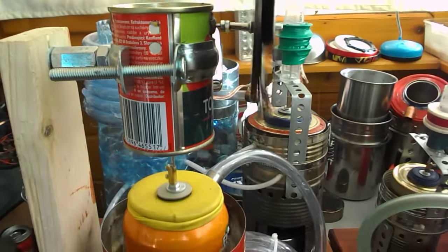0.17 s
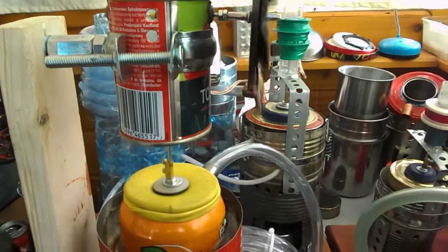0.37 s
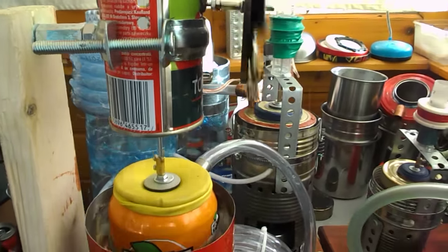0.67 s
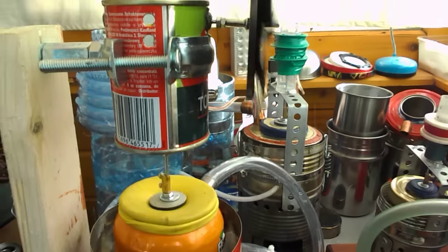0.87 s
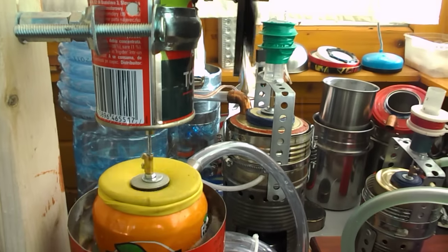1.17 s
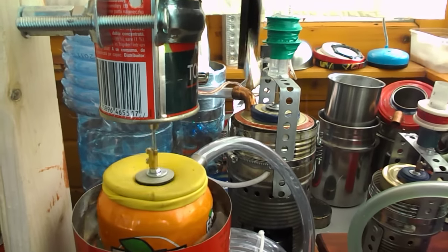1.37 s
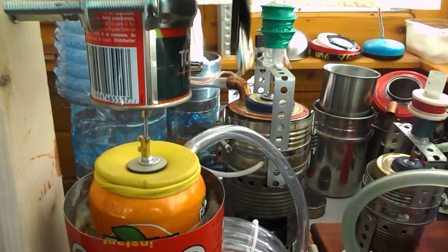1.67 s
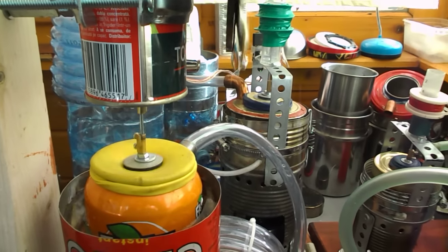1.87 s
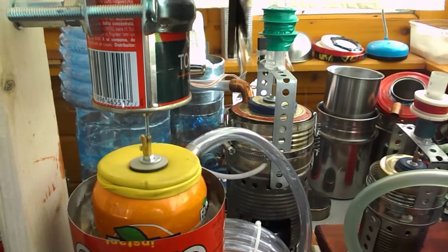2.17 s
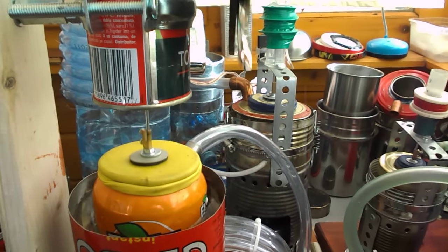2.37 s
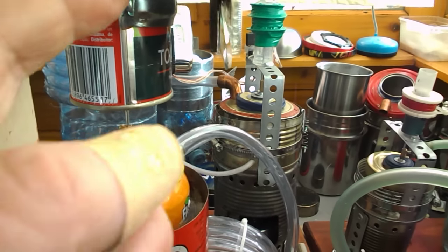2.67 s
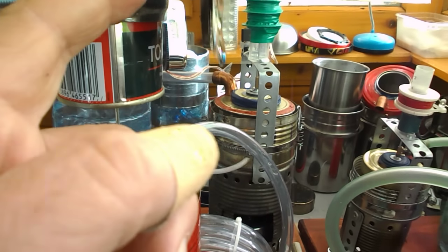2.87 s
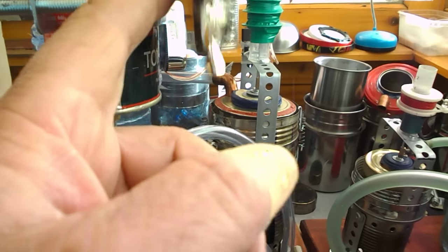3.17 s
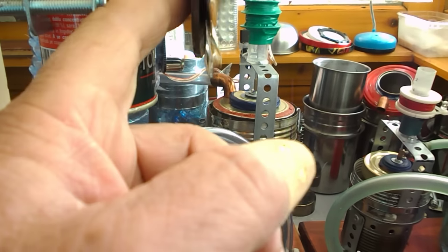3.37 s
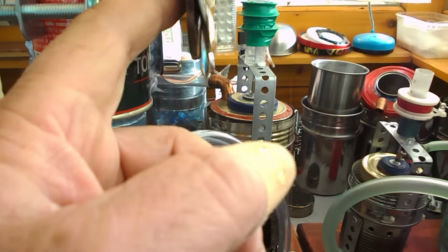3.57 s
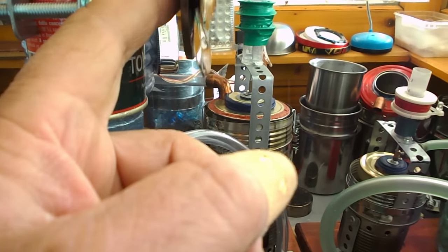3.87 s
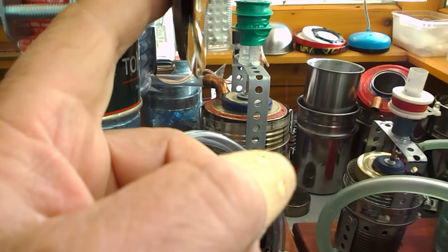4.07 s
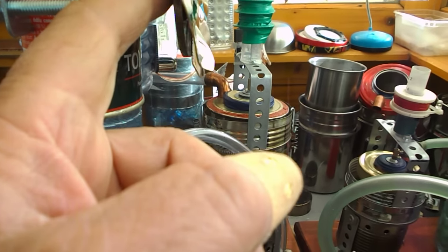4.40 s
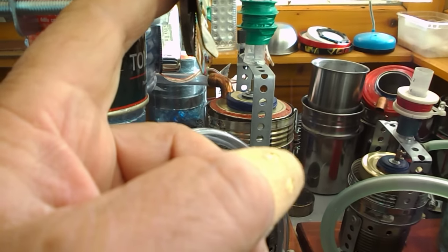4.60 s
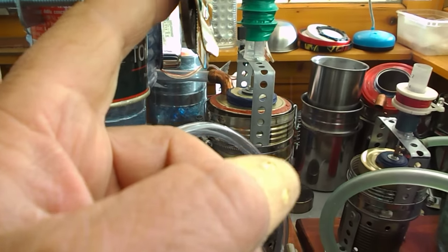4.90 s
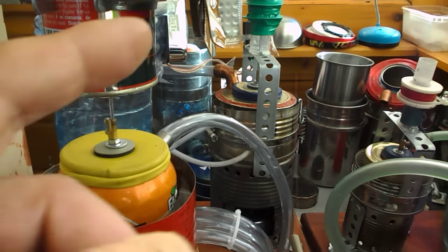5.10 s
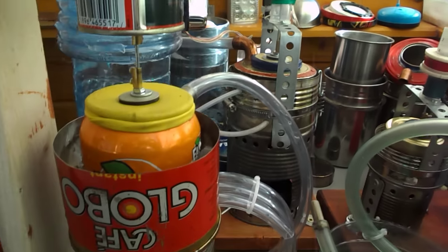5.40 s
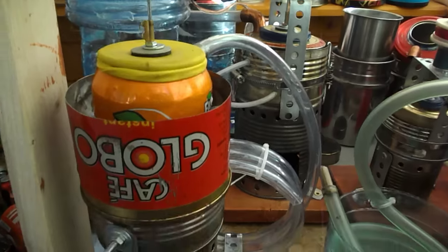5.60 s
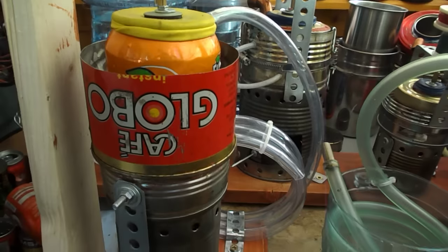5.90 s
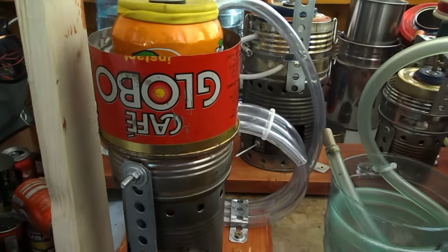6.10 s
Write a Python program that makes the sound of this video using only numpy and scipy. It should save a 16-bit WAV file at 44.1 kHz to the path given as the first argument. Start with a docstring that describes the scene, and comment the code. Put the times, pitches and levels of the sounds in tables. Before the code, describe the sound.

Fast, loose metallic ticking from a homemade can engine slackens into separate clacks, stops at about 4.6 seconds, then faint electric buzz and handling scrapes.

```python
"""A small tin-can hot-air engine clatters close to a camera in a workshop, at first about ten turns a second.
Its slack joints excite modes of cans, linkage and flywheel; hollow pops, board thuds and a few snaps join in.
The turns lengthen until a hand brakes the wheel, leaving the quiet room and a pulsing buzz present throughout.
Near the end a faint tone rises, two more snaps sound and strokes of grainy friction rub near the camera.
Blows are filtered noise bursts through decaying modes; room, air and rumble are coloured noise."""
import sys
import numpy as np
from scipy import signal
from scipy.fft import rfft, irfft
from scipy.io import wavfile
from scipy.ndimage import uniform_filter1d

SR = 44100
rng = np.random.default_rng(int(sys.argv[2]) if len(sys.argv) > 2 else 0)


def digitize_waveform(pressure):
    """Quantize a signal to 16-bit integers and store it at the path in sys.argv[1].

    Rows of a 2-D input are taken as channels; values are limited to [-1, 1].
    """
    field = np.atleast_2d(pressure).T
    bounded = np.clip(field, -1, 1)
    quanta = np.round(bounded * 32767).astype(np.int16)
    wavfile.write(sys.argv[1], SR, quanta)


N = 275625  # samples

# Levels in the tables are relative; the sources may scale them further.
# Spectral density of the room hush: f/Hz, level/dB
ROOM_SPECTRUM = [(35, -46.5), (60, -9.5), (100, -14), (170, -6), (306, -5.5), (458, -10), (1120, -12),
                 (1400, -12), (1500, -13.5), (1600, -16.5), (5470, -17.5), (7640, -15.5), (10400, -17),
                 (12500, -44), (16200, -76.5), (22000, -120)]
ROOM_DB = -55  # rms level of the hush
# Slow air on the microphone: t/s, level/dB
AIR_LEVEL = [(0, -58), (2, -63), (4.2, -60), (4.6, -75.5), (5.5, -77), (5.88, -58), (6.25, -76)]
# Faint tone of fixed pitch: t/s, level/dB
TONE_LEVEL = [(5.25, -88), (5.4, -68.5), (6.25, -68)]
TONE_HZ = 1400
# Rubbing strokes near the camera: t/s, attack/s, hold/s, release/s, low scrape level/dB, high scrape level/dB
RUB_STROKES = [(5.813, 0.036, 0.078, .01, -52, -50), (5.965, .055, 0.027, 0.11, -54.5, -48),
               (6.151, .015, .01, .025, -61, -53), (6.202, .012, .03, 0.026, -58, -51)]
# Low modes of the rubbed shell: f/Hz, level/dB, t60/s
RUB_LOW_MODES = [(400, -9, 0.012), (1000, -6, 0.0073), (1460, -14, 0.0055), (2900, -4, 0.0079),
                 (3500, -3, 0.0048)]
# High modes of the rubbed shell: f/Hz, level/dB, t60/s
RUB_HIGH_MODES = [(4530, -13, .004), (5500, -3.5, .004), (6900, 2, 0.003), (8600, -6, 0.0027),
                  (10600, -11, 0.00298)]
BUZZ_HZ, BUZZ_RATE_HZ, BUZZ_DB = 7617, 58.7, -65.5  # pitch, pulse rate, level between pulses
# Lone snaps: t/s, level/dB, f/Hz, bass level/dB, treble level/dB
SNAPS = [(.831, -1, 3560, -20, -14), (.9, -19, 3100, -25, -14), (.974, -20, 3100, -25, -10),
         (5.811, -33, 2900, -18, 0), (5.8135, -33, 2900, -18, 0)]
# Modes of the base board: f/Hz, t60/s
BOARD_MODES = [(130, 0.38), (217, 0.23)]
# Strength of the push on the board: t/s, lower mode level/dB, upper mode level/dB
BOARD_PUSH = [(0, -43, -37), (1.1, -42, -38), (1.5, -47.5, -34), (2.05, -45.5, -36.5), (2.35, -39.5, -42.5),
              (2.7, -43.5, -49), (3.2, -34, -47), (3.6, -38.5, -37), (3.85, -45, -41.5), (4.15, -43.5, -47),
              (4.4, -46, -61)]
PUSH_TURNS = (0.273, 0.1594)  # place in the turn for the lower and upper mode
SLOW_S = 3.95  # from then on the rods push the board too
# Hollow pops of the cans and membrane: t/s, level/dB, f/Hz
CAN_POPS = [(0.149, -30, 980), (.176, -28, 413), (0.245, -27, 1030), (.346, -30, 1120), (0.369, -30, 475),
            (.438, -28, 1050), (.465, -26.5, 399), (0.632, -23, 1085), (0.733, -20.5, 962),
            (.829, -18.5, 1003), (.927, -29, 1100), (1.03, -26, 800), (1.119, -21.5, 946),
            (1.219, -22.5, 1000), (1.329, -19.5, 1050), (1.403, -35, 680), (1.514, -26, 1006),
            (1.627, -18, 1080), (1.715, -28.5, 497), (1.795, -30, 1170), (1.816, -32, 503),
            (1.917, -32, 626), (1.947, -31, 450), (2.021, -33, 468), (2.117, -25.5, 620),
            (2.173, -28.5, 430), (2.272, -31, 430), (2.301, -26.5, 1130), (2.482, -31, 395),
            (2.652, -30, 466), (2.759, -31.5, 500), (2.831, -28, 440), (3.048, -25.5, 476),
            (3.15, -29, 456), (3.267, -27, 458), (3.377, -36, 404), (3.423, -32, 630), (3.461, -30.5, 395),
            (3.745, -31, 447), (3.783, -27, 523), (3.862, -30, 434), (3.911, -27, 498), (3.994, -31, 1430),
            (4.075, -34.5, 618), (4.184, -27.5, 1500), (4.315, -37.5, 555)]
# Crank pin taking up its slack: t/s, spokes level/dB, cans level/dB, rebound level in the spokes/dB
CRANK_BLOWS = [(0.0473, -8, -7, -11.5), (.144, -5.5, -10, -11), (.239, -6, -11, -13),
               (0.3351, -8, -9, -11.5), (0.4313, -7.5, -10, -10.5), (0.5282, -1, -11, -14.5),
               (.625, -4.5, -11.5, -8), (.7215, -9, -8.5, -7), (0.8202, -6.5, -9, -7),
               (0.9164, -10.5, -8, -6), (1.015, -5, -6.5, -8), (1.1142, -6, -7.5, -11),
               (1.2125, -7.5, -10, -6.5), (1.312, -8, -6, -8), (1.4098, -10, -6.5, -4),
               (1.512, -6.5, -6.5, -8), (1.611, -5, -6.5, -3.5), (1.711, -9, -10.5, -8),
               (1.813, -4.5, -6.5, -7), (1.913, -10.5, -6, -3), (2.015, -7.5, -7.5, -5.5),
               (2.1175, -9.5, -9, -12), (2.2192, -14, -18, -11), (2.321, -8, -14, -12.5),
               (2.428, -7.5, -17, -18), (2.533, -10, -11, -14), (2.637, -12.5, -13, -12),
               (2.747, -17, -15, -15.5), (2.854, -11, -16, -21), (2.963, -12.5, -19, -15),
               (3.0724, -12, -22, -16), (3.182, -15, -21, -13.5), (3.295, -13.5, -17, -18),
               (3.408, -11.5, -16, -13.5), (3.5221, -17.5, -16.5, -18.5), (3.6438, -11.5, -12.5, -22),
               (3.7685, -11, -11.5, -17.5), (3.908, -13.5, -11.5, -17), (4.07, -15, -16, -19.5),
               (4.303, -21.5, -18, -23)]
# Rods knocking on the cans between crank blows: t/s, cans level/dB
ROD_KNOCKS = [(0.0775, -12), (0.1717, -8), (.265, -13), (0.364, -7.5), (.461, -15), (.557, -15),
              (.609, -25), (0.6515, -11.5), (0.751, -18), (.849, -17), (0.899, -19), (1.0487, -17),
              (1.143, -8.5), (1.257, -15), (1.344, -14.5), (1.452, -10.5), (1.545, -10), (1.558, -18),
              (1.594, -18), (1.652, -12.5), (1.703, -20), (1.754, -13.5), (1.853, -12.5), (1.955, -13.5),
              (2.0594, -12), (2.104, -12.5), (2.1602, -12), (2.213, -11), (2.2726, -19.5), (2.305, -11.5),
              (2.364, -16), (2.404, -16), (2.411, -20), (2.4712, -9), (2.507, -16.5), (2.577, -11.5),
              (2.622, -15), (2.684, -8), (2.7306, -22), (2.794, -13), (2.835, -20), (2.897, -13.5),
              (2.928, -22), (2.947, -23), (3.005, -11.5), (3.038, -16.5), (3.053, -23), (3.116, -15.5),
              (3.148, -21), (3.167, -26), (3.255, -15.5), (3.279, -29), (3.338, -12.5), (3.364, -21),
              (3.4526, -11.5), (3.476, -19), (3.501, -19.5), (3.569, -22), (3.592, -10), (3.69, -17.5),
              (3.717, -8), (3.8466, -11), (3.9967, -11.5), (4.1848, -12), (4.578, -23.5)]
REBOUND_S, SECOND_REBOUND_S = 0.013, 0.025  # delays after a crank blow
SECOND_DB, SECOND_FADE_DB_PER_MS = -6.5, -0.74  # the second rebound dies out as the turns get longer
FAST_TURN_S = 0.099
# Sharing of a blow as the slack shifts:
# t/s, spokes level in a rod knock/dB, cans level in a rebound/dB, light tap level/dB
BLOW_SHARE = [(0, -3.5, -35, -28.5), (1.1, -10, -15, -26), (1.5, -12, -18.5, -32), (2.4, -7.5, -0.5, -20),
              (3.4, -15, -0.5, -27), (4.1, -9.5, -3, -35), (4.6, -9, 0, -53)]
TAP_TURNS = (0.682, 0.86)  # mean places of the light taps in a turn
TAP_SCATTER_S, TAP_SCATTER_DB, TAP_SPOKES_DB = 0.0028, 1, -16
# Play in the rods: t/s, first touch level/dB, rebound delay/s, rebound level/dB, linkage level below the cans/dB
ROD_SLACK = [(0, -24, 0.0085, -19, -13.5), (1.3, -18, 0.0092, -12, -13.5), (2.4, -39, 0.0052, -7, -13),
             (3.4, -18, .007, -9, -12.5), (3.7, -18, .012, -25, -11), (3.85, -10, 0.019, -5, -14),
             (4.0, -16, 0.011, -7, -14), (4.2, -10, 0.017, -8, -11.5), (4.58, -13, 0.017, -14, -13.5)]
TOUCH_S = 0.0058  # lead of the first touch over the rod knock
# Loose rattle between the knocks: t/s, spokes level/dB, cans and linkage level/dB, rumble level/dB
RATTLE_LEVELS = [(0, -29.5, -22, -43), (.4, -33, -26, -42.5), (.75, -32, -24.5, -42),
                 (1.4, -30.5, -22, -42), (2.4, -40, -29, -42.5), (2.7, -40, -31, -45),
                 (3.55, -35.5, -27.5, -44.5), (4.19, -37, -38, -47), (4.32, -42, -35.5, -53.5),
                 (4.45, -50.5, -50.5, -52), (4.602, -49, -44, -48)]
# Metal modes, of the linkage below 4400 Hz, the cans to 7700 Hz, the spokes above: f/Hz, level/dB, t60/s
TIN_MODES = [(1468, -14.5, 0.024), (2262, -8.5, 0.039), (2750, -20, 0.0093), (2980, -5, 0.03),
             (3403, -3.5, 0.021), (3647, -6.5, 0.04), (4010, -2, 0.028), (4342, 1, 0.017),
             (4885, -17, 0.074), (4940, -6.5, 0.014), (5167, -13.5, 0.05), (5364, -1.5, 0.0075),
             (5290, -16, 0.011), (5960, -0.5, 0.0097), (6660, -3.5, 0.0047), (6670, 5.5, 0.0097),
             (6860, 2, 0.0098), (6880, -10, 0.0085), (7460, 1.5, 0.0097), (8183, 1, 0.0093),
             (8100, -2.5, 0.0038), (8610, -6, 0.058), (8930, -1.5, 0.017), (9090, 5.5, 0.018),
             (9464, -0.5, 0.024), (9980, 4, 0.013), (10384, -10, 0.022)]
# Flywheel modes: f/Hz, level/dB, t60/s
WHEEL_MODES = [(2568, -13, .3), (3537, -2, .22), (5862, 4, .55), (5925, 4, .7), (7957, -13, .4),
               (8592, -12, .35), (8699, -13, .3), (9162, -12, .37), (9340, -10, .45), (9475, -10, .25),
               (10250, -10, .5), (11800, -21, .5)]
# How freely the rim rings: more as the turns slow, until the hand stops it: t/s, level/dB
RIM_FREEDOM = [(0, -24), (3.5, -20), (3.9, -8), (4.575, -7), (4.61, -50)]
# Spectral density of the frame rumble: f/Hz, level/dB
RUMBLE_SPECTRUM = [(35, -53), (60, -22), (129, -6), (183, -16.5), (377, 1), (445, 2.5), (732, -10.5),
                   (1020, -4.5), (1920, -19.5), (2200, -16), (2860, -28), (4840, -120)]
TOP_HZ = 12050  # upper limit of the camera's band


def undb(db):
    """Level law: amplitude is ten to the power dB / 20."""
    return 10 ** (np.asarray(db) / 20)


def unit(x):
    """Normalization to a root-mean-square value of 1."""
    return x / np.sqrt(np.mean(x ** 2))


def curve(s, v):
    """Linear interpolation in time through the given points, held beyond the ends."""
    return np.interp(np.arange(N) / SR, s, v)


def ring(x, hz, t60):
    """Damped resonance of one mode: a unit click rings with an exponential envelope starting at 1."""
    pole = np.exp(2j * np.pi * hz / SR - np.log(1000) / (t60 * SR))
    return signal.lfilter([1], [1, -pole], x).imag


def coloured(points):
    """Spectral shaping of white noise, normalized to rms 1."""
    hz, db = np.transpose(points)
    f = np.maximum(np.arange(N // 2 + 1) * SR / N, 1)
    shape = undb(np.interp(np.log(f), np.log(hz), db))
    return unit(irfft(rfft(rng.standard_normal(N)) * shape, N))


def strikes(s, size, fall_s):
    """Impulsive excitation: sudden start, exponential fall, energy equal to size squared."""
    x, keep = np.zeros(N), np.exp(-1 / (fall_s * SR))
    at = np.clip((np.asarray(s) * SR).astype(int), 0, N - 1)
    np.add.at(x, at, size)
    return signal.lfilter([np.sqrt(1 - keep ** 2)], [1, -keep], x)


def chatter(rate, spread_db):
    """Random superposition of small contacts, rate per second, of scattered size; rms 1."""
    place, size = rng.random((int(rate * N / SR), 2)).T
    return unit(strikes(place * N / SR, undb(spread_db * (size - 1)), 0.00069))


def wander(spread_db, rate):
    """Random modulation: the gain of a mode wanders irregularly, rate steps per second."""
    steps = rng.standard_normal(int(rate * N / SR) + 2)
    return undb(spread_db * curve(np.arange(len(steps)) / rate, steps))


def room_hush():
    """Stationary diffuse noise: the room has a fixed spectrum and level."""
    return undb(ROOM_DB) * coloured(ROOM_SPECTRUM)


def air():
    """Low-frequency pressure fluctuation: slow air on the microphone as modulated band noise."""
    gust = coloured([(15, -32), (28, -5), (50, -2.5), (90, -33.5)])
    return undb(curve(*np.transpose(AIR_LEVEL))) * gust


def faint_tone():
    """Pure tone: a sinusoid of fixed frequency and changing amplitude."""
    t = np.arange(N) / SR
    return undb(curve(*np.transpose(TONE_LEVEL))) * np.sin(2 * np.pi * TONE_HZ * t)


def buzz():
    """Amplitude modulation: a thin electric tone jumps and decays once each pulse period."""
    t = np.arange(N) / SR
    pulse = 1 + 4.4 * np.exp(-(t * BUZZ_RATE_HZ % 1) / 0.055)
    return undb(BUZZ_DB) * np.sin(2 * np.pi * BUZZ_HZ * t) * pulse


def rubbing():
    """Friction excitation: grainy noise through broad modes of a plastic shell, one swell per stroke."""
    grain = 1 + 0.33 * chatter(rate=600, spread_db=11)
    out = 0
    for k, modes in enumerate((RUB_LOW_MODES, RUB_HIGH_MODES)):
        shell = sum(undb(d) * ring(rng.standard_normal(N), f, t60) for f, d, t60 in modes)
        press = 0
        for s, rise, hold, fall, *db in RUB_STROKES:
            press = press + undb(db[k]) * curve(np.cumsum([s, rise, hold, fall]), [0, 1, 1, 0])
        out = out + press * unit(shell * grain)
    return out


def workshop():
    """Linear superposition of the room hush, slow air, rubbing and faint tone."""
    return room_hush() + air() + rubbing() + faint_tone()


def snaps():
    """Impulse response: a dry click excites a middle, a treble and a bass resonance."""
    out = 0
    for s, db, hz, bass_db, treble_db in SNAPS:
        click = strikes([s], undb(db), 1e-5)
        treble = undb(treble_db) * ring(click, 6750, 0.0084)
        thump = undb(bass_db + 13) * ring(click, 380, 0.0025)
        out = out + ring(click, hz, 0.0043) + treble + thump
    return out


def board():
    """Modal excitation: a push once a turn, later also by the rods, swells two low modes of the base."""
    s, rod_s = np.array(CRANK_BLOWS)[:, 0], np.array(ROD_KNOCKS)[:, 0]
    s = np.sort(np.r_[s, rod_s[rod_s > SLOW_S]])
    turn = np.minimum(np.diff(s, append=s[-1]), 0.16)
    t, *levels = np.transpose(BOARD_PUSH)
    out = 0
    for db, place, (hz, t60) in zip(levels, PUSH_TURNS, BOARD_MODES):
        at = s + place * turn
        push = strikes(at, undb(np.interp(at, t, db, right=-90)), 1e-5)
        rung = ring(push, hz, t60)
        # the band filter softens the onset into a swell
        band = signal.butter(1, [hz * 0.62, hz * 1.04], "band", fs=SR, output="sos")
        out = out + signal.sosfilt(band, rung)
    return out


def pops():
    """Strongly damped cavity oscillation: short hollow rings, each a few cycles long."""
    out = np.zeros(N + SR)
    t = np.arange(SR // 10) / SR
    for (s, db, hz), phase in zip(CAN_POPS, rng.random(len(CAN_POPS))):
        cycle = hz * t
        envelope = (1 - np.exp(-cycle / 0.88)) * np.exp(-cycle / 5.1)
        out[int(s * SR):][:len(t)] += undb(db) * envelope * np.sin(2 * np.pi * (cycle + phase))
    return out[:N]


def knocks():
    """Impact and rebound in slack joints: times, then levels in spokes, cans and linkage."""
    s, spoke_db, can_db, back_db = np.transpose(CRANK_BLOWS)
    turn = np.diff(s, append=2 * s[-1] - s[-2])
    rod_s, rod_db = np.transpose(ROD_KNOCKS)
    share_t, rod_share, back_share, tap_share = np.transpose(BLOW_SHARE)
    back_can_db = np.interp(s, share_t, back_share)
    second_db = back_db + SECOND_DB + SECOND_FADE_DB_PER_MS * (turn - FAST_TURN_S) * 1000
    rod_spoke_db = rod_db + np.interp(rod_s, share_t, rod_share)
    t, touch_db, lag, fall_db, link_db = np.transpose(ROD_SLACK)
    touch_db, lag, fall_db = (np.interp(rod_s, t, v) for v in (touch_db, lag, fall_db))
    # rows of time, spokes level, cans level
    rows = [(s, spoke_db, can_db),
            (s + REBOUND_S, back_db, back_db + back_can_db),
            (s + SECOND_REBOUND_S, second_db, second_db + back_can_db / 2),
            (rod_s, rod_spoke_db, rod_db),
            (rod_s - TOUCH_S, rod_spoke_db + touch_db / 2, rod_db + touch_db),
            (rod_s + lag, rod_spoke_db + fall_db, rod_db + fall_db)]
    for place in TAP_TURNS:
        chance = rng.standard_normal((len(s) - 1, 2)).T
        at = (s + place * turn)[:-1] + TAP_SCATTER_S * chance[0]
        db = np.interp(at, share_t, tap_share) + TAP_SCATTER_DB * chance[1]
        rows.append((at, db + TAP_SPOKES_DB, db))
    s, spoke_db, can_db = np.concatenate(rows, axis=1)
    linkage_db = np.maximum(can_db, spoke_db - 3) + np.interp(s, t, link_db)
    return s, spoke_db, can_db, linkage_db


def joint_forces():
    """Contact excitation of spokes, cans and linkage: each knock swells and shakes on; rattle fills in."""
    s, *levels = knocks()
    t, spoke_db, can_db, _ = np.transpose(RATTLE_LEVELS)
    fills = (spoke_db - 25.5, can_db - 31.5, can_db - 37.5)
    running = np.arange(N) < t[-1] * SR
    swell = int(0.0026 * SR)
    forces = []
    for db, gain_db, fill_db in zip(levels, (-11, -10, -10), fills):
        loose = chatter(rate=2200, spread_db=13)
        size = undb(db + gain_db)
        blow = strikes(s, size, 0.004)
        blow = uniform_filter1d(uniform_filter1d(blow, swell), swell)
        shake = uniform_filter1d(strikes(s, size, 0.0061), 2 * swell) * loose
        rattle = running * loose * undb(curve(t, fill_db))
        forces.append(blow + shake + rattle)
    return forces


def tin(forces):
    """Modal superposition: noise shaped by the contact force drives linkage, cans and spokes."""
    spokes, cans, linkage = forces
    out = 0
    for f, d, t60 in TIN_MODES:
        force = linkage if f < 4400 else cans if f < 7700 else spokes
        scrape = force * wander(spread_db=2.5, rate=60) * rng.standard_normal(N)
        out = out + undb(d) * ring(scrape, f, t60)
    return out


def flywheel(spokes):
    """Lightly damped resonance: spoke blows excite the rim, which rings more as the turns slow, then is stopped."""
    out = 0
    for f, d, t60 in WHEEL_MODES:
        out = out + undb(d) * ring(undb(-14) * spokes * rng.standard_normal(N), f, t60)
    return out * undb(curve(*np.transpose(RIM_FREEDOM)))


def frame_rumble(spokes, cans):
    """Energy-dependent excitation: coloured noise grows while the joints knock."""
    t, _, _, rumble_db = np.transpose(RATTLE_LEVELS)
    power = uniform_filter1d((spokes + cans) ** 2, int(0.014 * SR))
    mean_power = np.abs(uniform_filter1d(power, int(0.3 * SR))) + 1e-12
    busy = np.abs(power / mean_power) ** 0.22
    fade = curve([4.3, 4.6], [1, 0])
    return coloured(RUMBLE_SPECTRUM) * undb(curve(t, rumble_db) + 2.5) * busy * fade


def engine():
    """Common excitation: the same joint forces drive the tin, the flywheel and the frame."""
    forces = joint_forces()
    spokes, cans, _ = forces
    return tin(forces) + flywheel(spokes) + frame_rumble(spokes, cans)


def scene():
    """Direct and reflected sound: the near sources, their diffuse tail and the workshop add."""
    near = engine() + pops() + board() + snaps()
    # the near sounds carry no deep bass below about 95 Hz
    near = signal.sosfilt(signal.butter(3, 95, "high", fs=SR, output="sos"), near)
    # shelves and walls send back a short diffuse tail
    t = np.arange(SR // 3) / SR
    tail = rng.standard_normal(len(t)) * np.exp(-np.log(1000) * t / 0.034) * (t > 0.003)
    wet = signal.fftconvolve(near, tail / np.sqrt(np.sum(tail ** 2)))[:N]
    return (near + undb(-13.5) * wet + workshop())[None]


def record(dry):
    """Transducer response: the microphone dips and rolls off; the camera rounds peaks and cuts the top."""
    heard = signal.lfilter(*signal.iirnotch(7620, 30.0, SR), dry)
    heard = signal.sosfilt(signal.butter(2, 11000, fs=SR, output="sos"), heard)
    # the buzz joins after the peaks are rounded
    heard = np.tanh(1.1 * heard) / 1.1 + buzz()
    return signal.sosfilt(signal.ellip(8, 0.2, 60, TOP_HZ, fs=SR, output="sos"), heard)


dry = scene()
out = record(dry)
digitize_waveform(out)
```